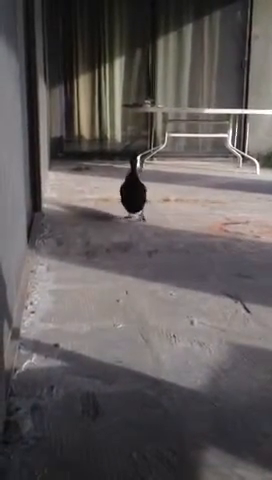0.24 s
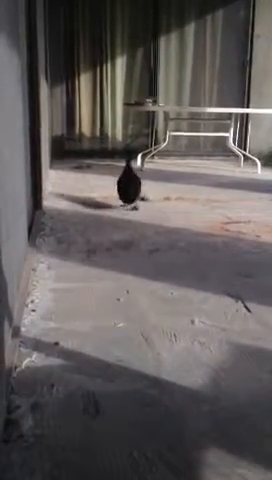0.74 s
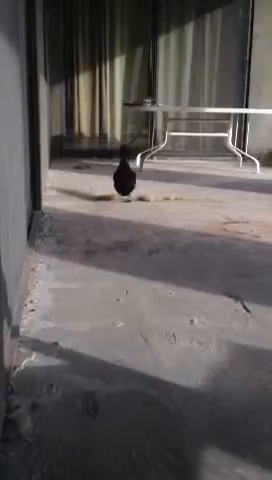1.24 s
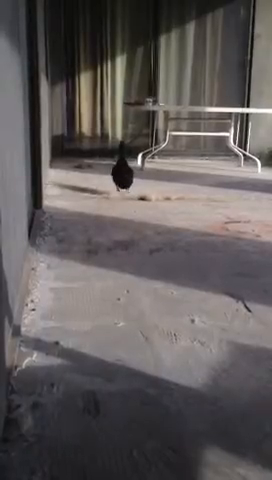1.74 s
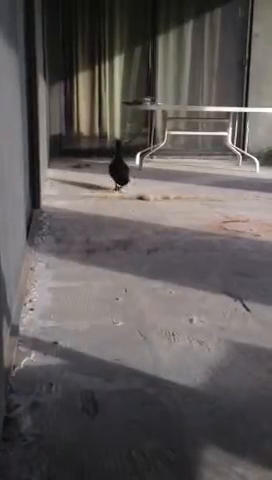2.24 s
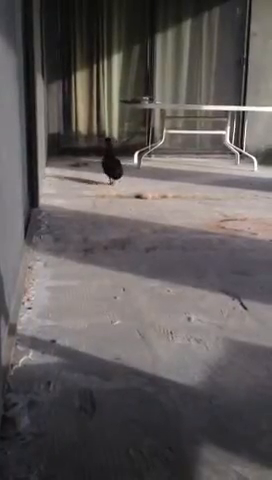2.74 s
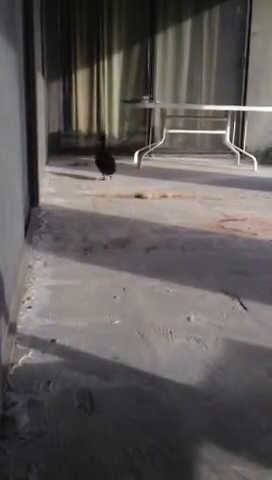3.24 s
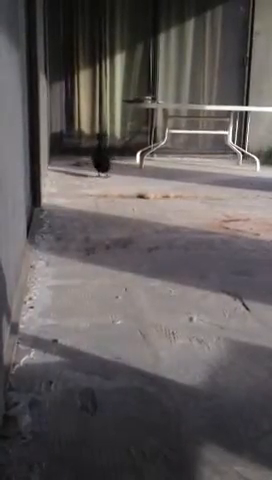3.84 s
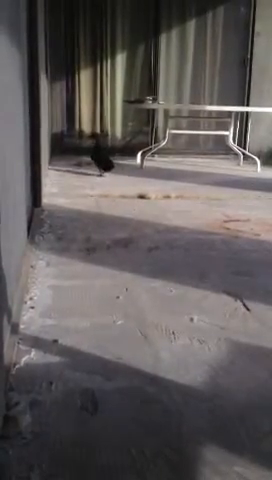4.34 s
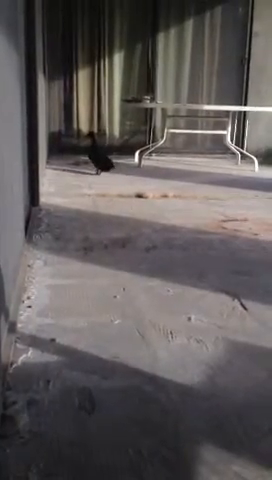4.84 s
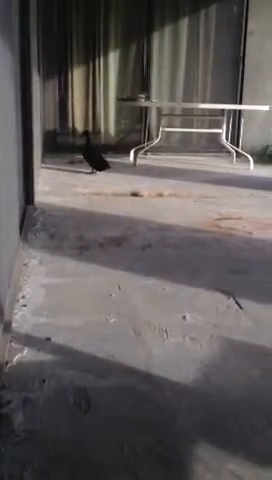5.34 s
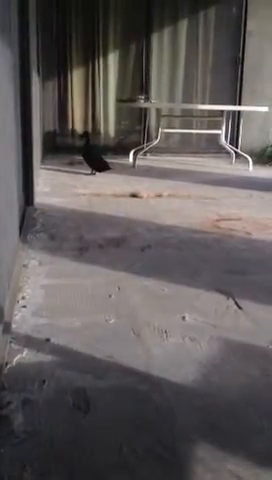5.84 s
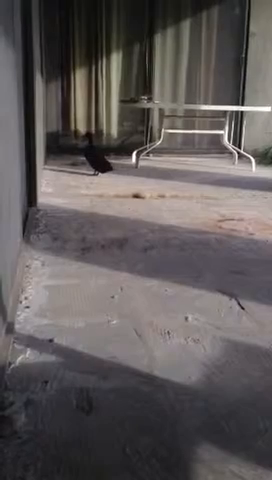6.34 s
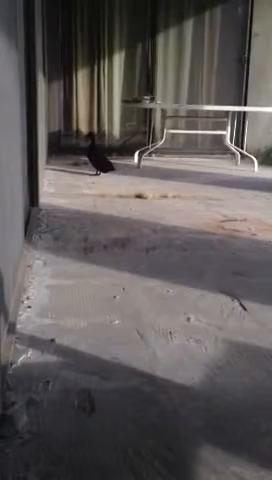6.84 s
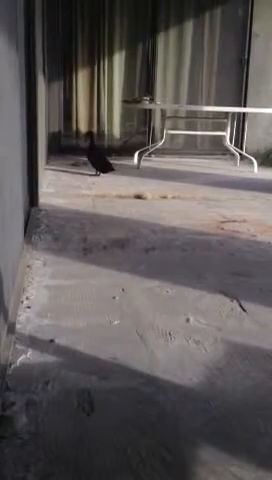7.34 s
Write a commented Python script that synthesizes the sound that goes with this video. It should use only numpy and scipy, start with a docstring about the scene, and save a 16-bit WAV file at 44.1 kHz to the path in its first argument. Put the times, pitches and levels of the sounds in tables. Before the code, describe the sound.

A duck gives six loud, hoarse, evenly spaced quacks on an echoing porch, then a faint distant bird and one softer quack.

```python
"""A hoarse quack, already under way, opens the scene: a duck on a concrete porch calls six times.
House walls ring after every call. In the pause that follows, a distant bird squeaks and whistles,
then comes a softer seventh quack. The duck is made of throat slaps and rasping air shaped by throat and bill;
the bird is gliding tones. Soft low bumps reach the hand-held microphone, over a faint rumble, hum and hiss."""
import sys
import numpy as np
from scipy import signal
from scipy.fft import rfft, irfft, next_fast_len
from scipy.io import wavfile
from scipy.ndimage import map_coordinates

SR = 44100
rng = np.random.default_rng(int(sys.argv[2]) if len(sys.argv) > 2 else 0)


def to_wav(sig):
    """Store sig (one row per channel, or 1-D mono) as 16-bit WAV at the path in sys.argv[1].

    Samples outside -1..1 are clipped; the rate is SR.
    """
    pcm = np.clip(np.atleast_2d(sig), -1, 1) * 32767
    pcm = np.round(pcm).astype(np.int16)
    wavfile.write(sys.argv[1], SR, pcm.T)  # frames by channels


N = 335160  # length of the scene in samples

# The duck's calls, levels before swell and porch: start_s, length_s, level_db, top_pitch_hz, widest_opening (0-1)
QUACK_CALLS = [(-.07, .18, -25, 257.4, 1), (0.826, .172, -26.5, 267.9, 1),
               (1.675, 0.19, -26.2, 255.6, 0.99), (2.566, .18, -25.5, 256.4, 1),
               (3.28, 0.18, -26, 249.7, 1), (4.027, .17, -26.5, 247.4, 0.99),
               (7.446, 0.1, -33.5, 213.2, 0.31)]


def duck():
    """Play every quack; each gets its own pattern of wall echoes."""
    track = np.zeros(N)
    for start_s, *call in QUACK_CALLS:
        add(track, start_s, porch(quack(*call), wet_db=-2.5))
    return track


# Resonances of the throat with the bill nearly shut: center_hz, width_hz, level_db
THROAT_BILL_SHUT = [(399, 90, -13.5), (700.7, 130, 4.5), (945, 62, -7.5), (1000, 200, -3), (1350, 270, 4),
                    (1740, 220, -29)]
# The same with the bill wide open: center_hz, width_hz, level_db
THROAT_BILL_OPEN = [(360, 120, -23), (494, 120, -9.5), (666.5, 108, -4), (892, 100, -5), (1467, 182, 2.5),
                    (1895, 220, -2.5), (3210, 2300, -12)]
# Resonances of the bill, before the slight retuning in quack(): center_hz, width_hz, level_db
BILL_RESONANCES = [(4160, 406, -3.5), (5060, 354, 2.5), (5587, 602, -6.5), (6645, 450, -21.5),
                   (7900, 2300, -30), (11400, 2700, -33)]
# Overall tone of the bill sound: frequency_hz, level_db
BILL_TONE = [(1500, -30), (3600, -16.5), (4500, -9), (6400, 6), (7300, 5), (9500, -7.5), (11300, -3),
             (15000, 0.5)]
# Clear low tones of the voice, levels relative to CHEST_DB: multiple_of_pitch, level_db
CHEST_PARTIALS = [(1, 5), (1.5, -7), (2, 1), (2.5, -3), (3, -11.5)]
# breath pressure swells, holds, then lets go; loudness and pitch follow the swell
SWELL_S, SWELL_DB, RELEASE_S, RELEASE_DB = .09, 8.5, .016, 9
PITCH_RISE, PITCH_SAG_PER_S = .15, .4  # shares of the top pitch
# the bill swings open at the start of each quack, and its ring comes up with it
OPEN_S, BILL_DB, BILL_SHUT_DB = 0.05, -2.5, -7.5
THROAT_RASP, BILL_RASP = 0.4588, 0.806  # share of rasping air (0-1)
DOUBLING, CHEST_DB = .62, -22.5  # how uneven neighboring cycles are, level of the low tones


def quack(length_s, level_db, top_hz, widest, jitter=.018, scatter_db=1.75, low_cut_hz=300,
          throat_top_hz=3600, shut_top_hz=6200, soft_hz=800, soft_s=0.039, rasp_low_hz=600, tuning=1.005):
    """The voice organ (syrinx) slaps shut once a cycle; slaps and rasping air ring the throat and bill."""
    size = int(length_s * SR)
    t = np.arange(size) / SR
    pressure = ramp(t, SWELL_S)
    gape = ramp(t, OPEN_S)
    effort_db = -SWELL_DB * (1 - pressure) - RELEASE_DB * (1 - ramp(length_s - t, RELEASE_S))
    sag = PITCH_SAG_PER_S * np.maximum(t - SWELL_S, 0)
    pitch_hz = top_hz * (1 - PITCH_RISE * (1 - pressure) - sag)
    opening = np.clip(widest * gape, 0, 1)
    cycles = np.cumsum(pitch_hz * (1 + jitter * wobble(200, size))) / SR

    # every other cycle is weaker, which puts hoarse lines between the harmonics
    unevenness = 1 + DOUBLING * gape * np.cos(np.pi * cycles)
    strength = unevenness * amp(scatter_db * wobble(149.7, size))
    slaps = unit(np.diff(np.floor(cycles), prepend=0) * strength)
    # the air rasps in puffs, one per cycle
    puffs = np.exp(0.54 * np.cos(2 * np.pi * cycles))
    rasp = unit(rng.standard_normal(size) * strength * puffs)
    rasp = filtered(rasp, lambda f: f / np.hypot(f, rasp_low_hz))
    throat_source = blend(slaps, rasp, THROAT_RASP)
    bill_source = blend(slaps, rasp, BILL_RASP)

    def throat_band(f):
        """Keep the throat sound between its low and high limits."""
        return 1 / (1 + (low_cut_hz / (f + 1)) ** 6) / (1 + (f / throat_top_hz) ** 6)

    # as the bill opens, the vowel lifts and the top treble comes out
    shut = unit(filtered(throat_source, lambda f: resonances(THROAT_BILL_SHUT, f) * throat_band(f)))
    wide = unit(filtered(throat_source, lambda f: resonances(THROAT_BILL_OPEN, f) * throat_band(f)))
    throat = unit(blend(shut, wide, opening))
    bill = unit(filtered(bill_source,
                         lambda f: resonances(BILL_RESONANCES, f / tuning) * amp(along(BILL_TONE, f))))
    bill = unit(unmuffle(bill, shut_top_hz, opening))
    chest = np.zeros(size)
    for multiple, partial_db in CHEST_PARTIALS:
        waver = amp(3.044 * wobble(110, size))
        tone = unit(waver * np.sin(2 * np.pi * multiple * cycles))
        chest += gape * amp(CHEST_DB + partial_db) * tone

    voice = amp(-2.0) * throat + amp(BILL_DB + BILL_SHUT_DB * (1 - gape)) * bill + chest
    # the first cycles close softly and sound dull
    voice = unmuffle(voice, soft_hz, ramp(t, soft_s))
    return voice * amp(level_db + effort_db) * signal.windows.tukey(size, .04)


# How long each frequency takes to fade by 60 dB: frequency_hz, fade_s
PORCH_FADES = [(120, 0.31), (250, 0.26), (380, .5), (510, 0.68), (700, 0.42), (1250, 0.61), (1520, 0.52),
               (1750, 0.6), (2200, 0.54), (4000, 0.56), (5200, 0.55), (6500, 0.5), (14000, 0.37)]
# Standing waves between the walls: frequency_hz, level_db, fade_s (by 60 dB)
WALL_RINGS = [(500.5, -33, .8), (1488, -31, 0.62)]


def porch(x, wet_db, gap_s=0.0046, early_db=-6, early_span_s=.016, count=12):
    """Direct sound, quick bounces off floor and door, wall rings, and a tail fading at its own speed per pitch."""
    hz, t, spectrum = signal.stft(rng.standard_normal(SR), SR, nperseg=256)
    fade = amp(-60 * t / along(PORCH_FADES, hz)[:, None])
    tail = signal.istft(spectrum * fade, SR, nperseg=256)[1]
    age = np.arange(len(tail)) / SR
    tail = tail * np.minimum(age / gap_s, 1)  # the tail builds up over the gap
    response = amp(wet_db) * tail / np.linalg.norm(tail)

    delays_s = early_span_s * (np.arange(count) + rng.uniform(.2, 1, count)) / count
    positions = (np.append(0, delays_s) * SR).astype(int)
    gains = np.append(1, np.full(count, amp(early_db)))  # direct sound first, then bounces
    early = np.bincount(positions, gains, len(tail))
    response = response + early / np.linalg.norm(early)

    for ring_hz, level_db, fade_s in WALL_RINGS:
        ring = np.sin(2 * np.pi * ring_hz * age + rng.uniform(0, 2 * np.pi)) * amp(-60 * age / fade_s)
        response = response + amp(level_db) * ring / np.linalg.norm(ring)
    return signal.fftconvolve(x, response) / np.linalg.norm(response)


# Short chirps of the distant bird, levels before echoes: start_s, length_s, first_pitch_hz, level_db, rasp (0-1)
BIRD_CHIRPS = [(5.1, 0.31, 5210, -83, 0.82), (5.726, .1, 3280, -74.5, 0.85), (5.808, .1, 4420, -66.5, 0.4),
               (5.838, 0.0086, 5200, -58.5, .9), (5.868, .14, 6080, -67, .45), (5.882, .2, 7200, -79, .9),
               (6, .12, 8000, -79, .5), (7.107, .046, 3990, -71, 0.88)]
# Its long rising whistles, levels before partials and echoes are added:
# start_s, length_s, first_pitch_hz, last_pitch_hz, level_db
BIRD_WHISTLES = [(6.295, .28, 740, 1000, -66.5), (6.28, .34, 635, 775, -74), (6.579, .245, 787, 865, -62)]
# Tones that make up one whistle: multiple_of_pitch, level_db
WHISTLE_TONES = [(3, -19), (4, -13), (6, 4), (8, -16)]
CHIRP_RISE = 0.054  # every chirp glides up by this share


def far_bird(rasp_hz=350, whistle_flutter_hz=9):
    """Chirps made raspy by fast pitch shaking, then thin rising whistles with one strong partial."""
    track = np.zeros(N)

    def note(tone, level_db):
        """Set the level of a tone and fade both ends."""
        return amp(level_db) * unit(tone) * signal.windows.tukey(len(tone), .5)

    for start_s, length_s, first_hz, level_db, rasp in BIRD_CHIRPS:
        phase = glide(length_s, first_hz, first_hz * (1 + CHIRP_RISE), rasp * rasp_hz)
        add(track, start_s, note(np.sin(phase), level_db))
    for start_s, length_s, first_hz, last_hz, level_db in BIRD_WHISTLES:
        phase = glide(length_s, first_hz, last_hz, whistle_flutter_hz)
        tone = sum(amp(partial_db) * np.sin(multiple * phase) for multiple, partial_db in WHISTLE_TONES)
        add(track, start_s, note(tone, level_db))
    return porch(track, wet_db=-6.5, early_db=-14)[:N]


# Low bumps at the microphone, levels before the final filter: center_s, level_db
LOW_BUMPS = [(1.43, -50), (1.504, -45.5), (1.581, -46.5), (3.07, -51), (3.128, -44), (3.229, -51),
             (6.535, -54), (6.59, -48.5), (7.12, -31.5), (7.18, -44), (7.23, -39), (7.4, -50.5)]
BUMP_HZ, BUMP_REF_DB, BUMP_HZ_PER_DB = 129.6, -46, 2.5  # a harder bump sounds higher


def bumps(width_s=0.0029, shudder_db=-15, shudder_width_s=0.032):
    """Each bump is one dull push inside a short shudder."""
    track = np.zeros(N)
    t = np.arange(-SR // 10, SR // 10) / SR  # zero is the middle of the bump
    for center_s, level_db in LOW_BUMPS:
        hz = BUMP_HZ + BUMP_HZ_PER_DB * (level_db - BUMP_REF_DB)
        push = -np.cos(2 * np.pi * hz * t) * np.exp(-np.abs(t) / width_s)
        shudder = wobble(61.4, len(t)) * np.sin(2 * np.pi * hz * t) * np.exp(-(t / shudder_width_s) ** 2)
        add(track, center_s + t[0], amp(level_db) * (push + amp(shudder_db) * shudder))
    # keep roughly 65 to 480 Hz
    return filtered(track, lambda f: 1 / (1 + (65 / (f + 1)) ** 4) / (1 + (f / 480) ** 4))


# Loudness of the rumble over time, before RUMBLE_DB is added: time_s, level_db
RUMBLE_LEVELS = [(0.0, -90), (0.23, -86.5), (1.54, -79.5), (1.84, -85), (3.05, -81.5), (6.12, -85.5),
                 (7.37, -74.5), (7.6, -65)]
RUMBLE_DB = 3


def handling():
    """The hand on the microphone makes a faint, lumpy rumble: low noise with a wavering level."""
    rumble = unit(filtered(rng.standard_normal(N), lambda f: resonances([(99.3, 88, 0)], f) ** 2))
    level_db = np.interp(np.arange(N) / SR, *np.transpose(RUMBLE_LEVELS))
    return rumble * amp(level_db + RUMBLE_DB + 3.5 * wobble(11, N))


# Tone of the outdoor air, relative levels: frequency_hz, level_db (per Hz)
AIR_TONE = [(25, -33.5), (45, -28.5), (90, -14), (135, -3.5), (243, -4), (475, -10), (903, -13.5),
            (1540, -18.5), (3300, -18.5), (4700, -16), (5450, -10.5), (7500, -24), (9700, -28.5),
            (13000, -21.5), (15000, -22)]
AIR_DB = -67


def background(hum_hz=245, hum_width_hz=25, hum_db=-76):
    """Quiet outdoor air is shaped noise; the fuzzy distant hum is noise in a narrow band."""
    air = unit(filtered(rng.standard_normal(N), lambda f: amp(along(AIR_TONE, f))))
    hum = unit(filtered(rng.standard_normal(N), lambda f: resonances([(hum_hz, hum_width_hz, 0)], f) ** 2))
    return amp(AIR_DB + 0.28 * wobble(4.3, N)) * air + amp(hum_db) * hum


def amp(db):
    """Turn decibels into a gain."""
    return 10 ** (np.asarray(db) / 20)


def unit(x):
    """Scale to an average (rms) level of 1."""
    return x / np.sqrt(np.mean(x ** 2) + 1e-20)


def along(points, hz):
    """Read a curve of (Hz, value) points on a log frequency axis."""
    f, values = np.transpose(points)
    return np.interp(np.log(hz + 1), np.log(f + 1), values)


def wobble(rate_hz, size):
    """A smooth random curve through rate_hz random points a second."""
    knots = rng.standard_normal(int(size * rate_hz / SR) + 4)
    return map_coordinates(knots, [np.arange(size) * rate_hz / SR])


def filtered(x, response):
    """Filter x with a response given as a function of frequency."""
    size = next_fast_len(len(x) + 8192)  # spare room for the ringing
    return irfft(rfft(x, size) * response(np.fft.rfftfreq(size, 1 / SR)), size)[:len(x)]


def resonances(modes, f):
    """Add up ringing resonances (Hz, width Hz, dB) with alternating signs."""
    total = 0
    for k, (center, width, db) in enumerate(modes):
        peak = 1j * f * width / (center * center - f * f + 1j * f * width)
        total = total + (-1) ** k * amp(db) * peak
    return total


def blend(a, b, share):
    """Equal-power mix from a (share 0) to b (share 1)."""
    share = np.clip(share, 0, 1)
    return np.sqrt(1 - share) * a + np.sqrt(share) * b


def unmuffle(x, corner_hz, share):
    """Let through a moving share of everything above the corner."""
    dull = filtered(x, lambda f: 1 / (1 + (f / corner_hz) ** 10))
    return dull + share * (x - dull)


def ramp(t, span_s):
    """Rise from 0 to 1 over the span, then hold."""
    return np.clip(t / span_s, 0, 1)


def glide(length_s, first_hz, last_hz, flutter_hz):
    """Phase of a straight pitch glide with fast random flutter."""
    size = int(length_s * SR)
    pitch_hz = np.linspace(first_hz, last_hz, size) + flutter_hz * wobble(900, size)
    return 2 * np.pi * np.cumsum(pitch_hz) / SR


def add(track, start_s, x):
    """Mix x into the track from start_s, which may lie before zero."""
    start = round(start_s * SR)
    x, start = x[max(-start, 0):], max(start, 0)
    track[start:start + len(x)] += x[:max(N - start, 0)]


def scene():
    """All sources at one microphone."""
    return (duck() + far_bird() + bumps() + handling() + background())[None]


def record(dry, top_hz=15400):
    """Cut away everything from the band limit upward."""
    return np.array([filtered(channel, lambda f: f < top_hz) for channel in dry])


dry = scene()
out = record(dry)
to_wav(out)
```